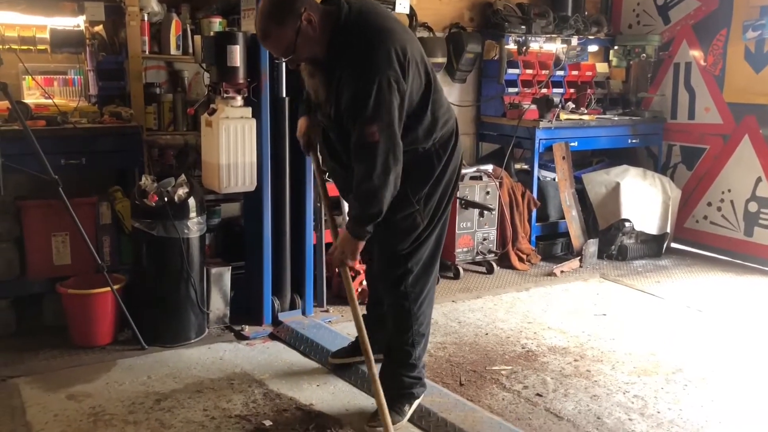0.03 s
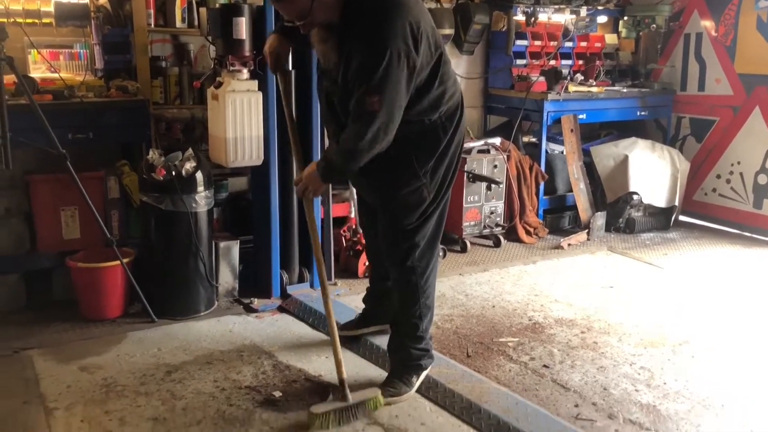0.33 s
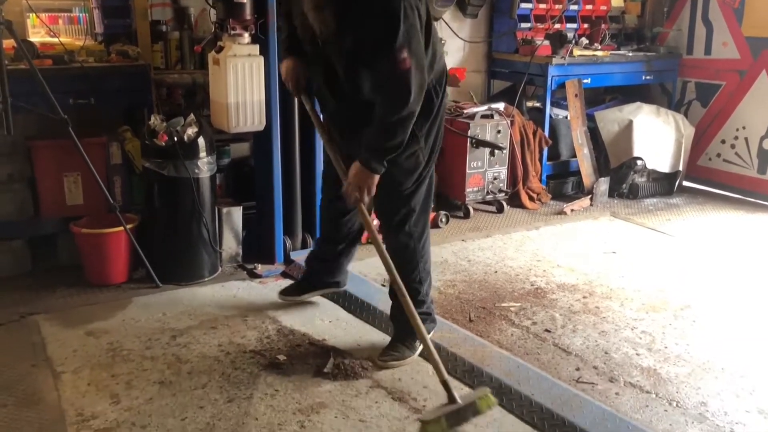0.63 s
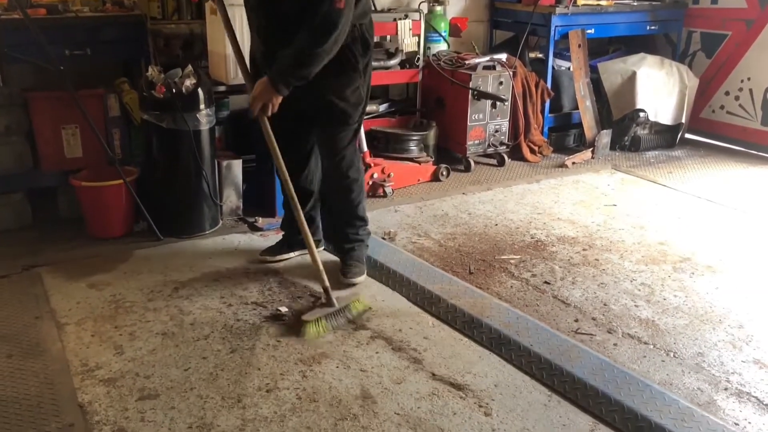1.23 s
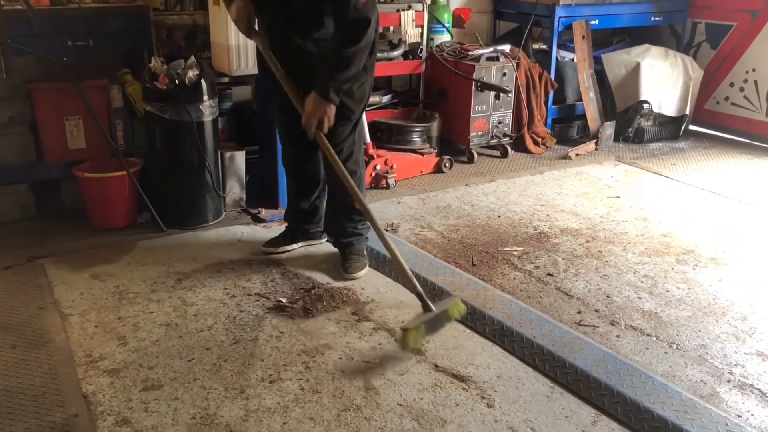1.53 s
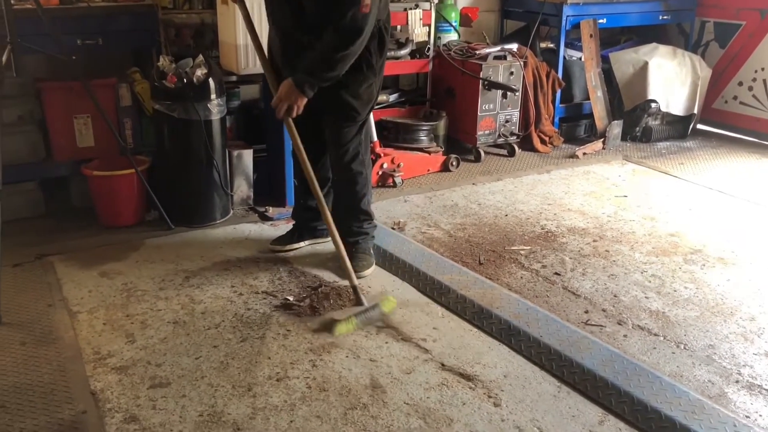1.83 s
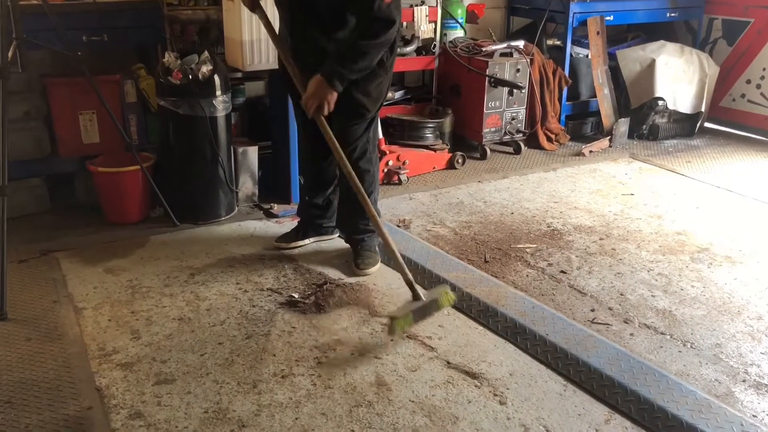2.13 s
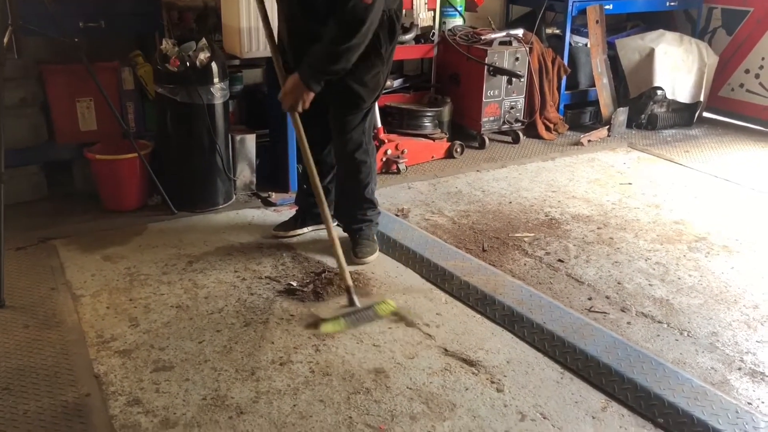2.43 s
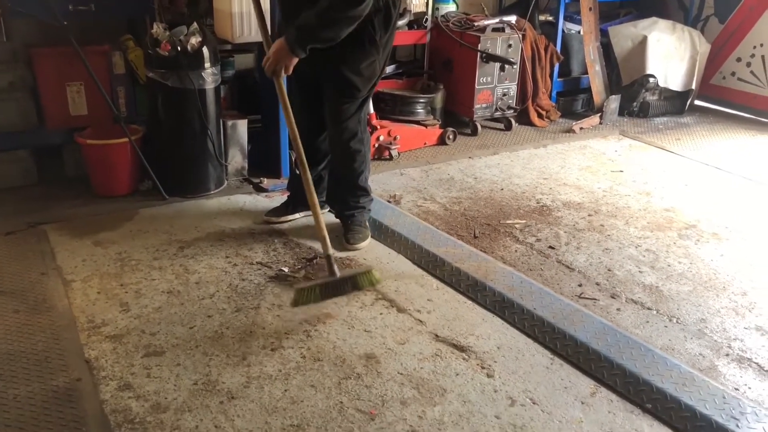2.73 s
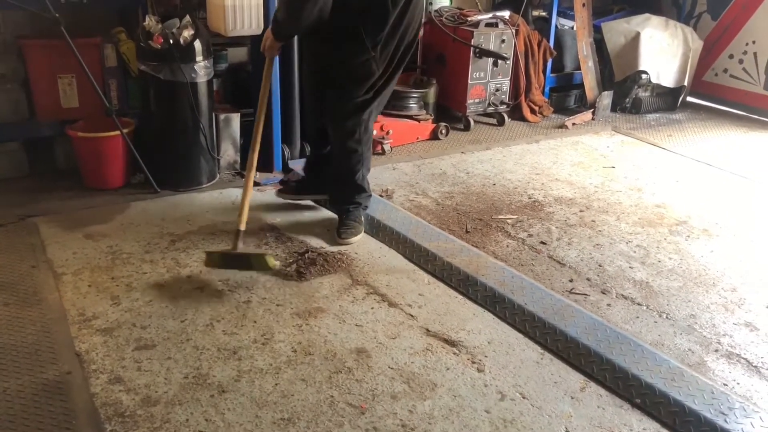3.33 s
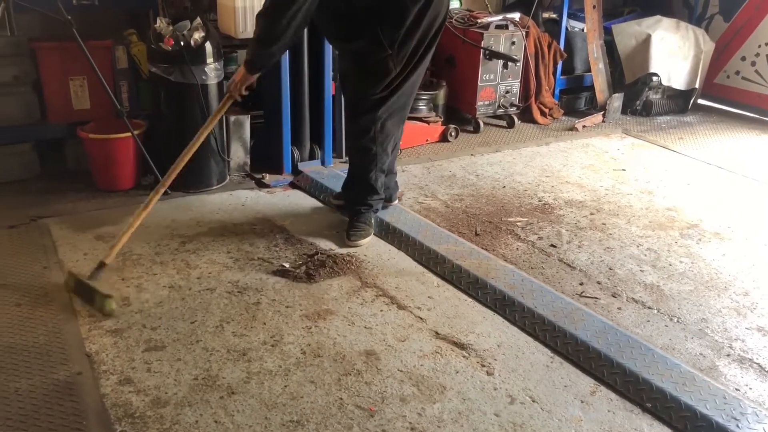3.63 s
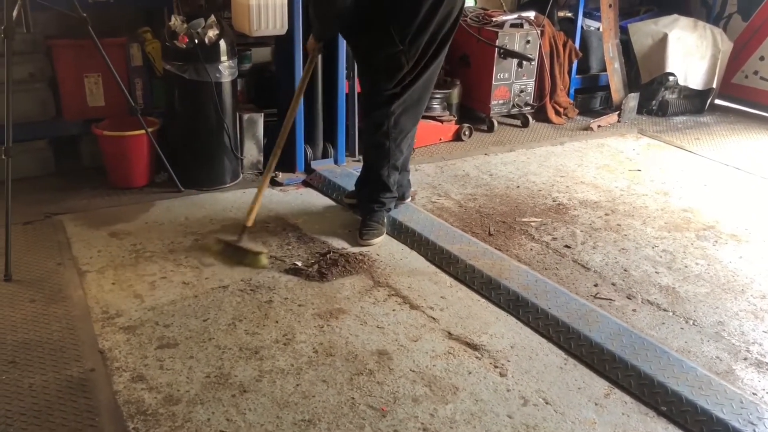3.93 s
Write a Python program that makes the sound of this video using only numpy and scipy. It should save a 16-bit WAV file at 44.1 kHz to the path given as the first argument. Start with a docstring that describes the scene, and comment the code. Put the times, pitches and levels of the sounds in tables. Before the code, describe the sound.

Six strokes of a stiff broom scrape grit along concrete in a faintly humming workshop. Bristles tap down, loose stones tick away and shoes scuff, then the broom head hits the floor with a rattling knock and sweeps once more.

```python
"""Over a faint room hum, a stiff broom starts the first of six strokes on a concrete workshop floor.
In each, the bristles tap down and hiss over rolling grit; the first two push into the dirt pile,
and most strokes also rasp. From 0.7 s single stones skitter away; from 0.8 s the sweeper's shoes
scuff and thud. At 3.6 s the broom head knocks on the floor and rattles, and the last stroke follows."""
import sys
import numpy as np
from scipy import signal
from scipy.fft import rfft, irfft
from scipy.io import wavfile
from scipy.ndimage import uniform_filter1d

SR = 44100
rng = np.random.default_rng(int(sys.argv[2]) if len(sys.argv) > 2 else 0)


def store_pcm(level_fs):
    """Save levels as 16-bit WAV."""
    pcm = np.round(np.clip(level_fs, -1, 1) * 32767).astype(np.int16)
    wavfile.write(sys.argv[1], SR, np.atleast_2d(pcm).T)


N = 176400


def undb(db):
    """Decibels to gain."""
    return 10 ** (np.asarray(db) / 20)


def since(start_s):
    """Seconds since start_s, per sample."""
    return np.arange(N) / SR - start_s


def colour(x, spectrum):
    """Shape x by (f/Hz, level/dB) points, roll off the bass, scale to rms 1."""
    hz, db = np.array(spectrum, float).T
    f = np.maximum(np.fft.rfftfreq(N, 1 / SR), 1)
    gain = undb(np.interp(np.log(f), np.log(hz), db))
    low_cut = f ** 2 / (f ** 2 + (hz[0] / 2) ** 2)
    y = irfft(rfft(x) * gain * low_cut, N)
    return y / np.std(y)


def noise(spectrum):
    """Coloured noise, rms 1."""
    return colour(rng.standard_normal(N), spectrum)


def clicks(per_s, spread_db):
    """Random tiny impacts, most weak, a few strong."""
    size = undb(spread_db * np.minimum(rng.exponential(size=N), 4.5))
    return (rng.random(N) < per_s / SR) * size * rng.choice([-1, 1], N)


def wander(rate_hz):
    """Smooth random curve, standard deviation 1."""
    hold = int(SR / rate_hz)
    y = uniform_filter1d(rng.standard_normal(N)[np.arange(N) // hold], hold)
    return y / np.std(y)


def swell(centre_s, half_s):
    """Gaussian envelope."""
    return np.exp(-.5 * (since(centre_s) / half_s) ** 2)


def blow(start_s, attack_s, t60_s):
    """Impact envelope: linear rise, exponential decay."""
    t = np.maximum(since(start_s), 0)
    return np.minimum(t / attack_s, 1) * np.exp(-np.log(1000) * t / t60_s)


def hits(table, spectrum, attack_s):
    """One noise burst per row."""
    return noise(spectrum) * sum(undb(db) * blow(s, attack_s, t60) for s, db, t60 in table)


def ringing_hits(table, spectrum, modes, attack_s, ring_db):
    """Noise bursts, each exciting the same modes."""
    ring = sum(undb(db + mode_db) * blow(s, attack_s, t60) * np.sin(2 * np.pi * hz * since(s))
               for s, db, _ in table for hz, mode_db, t60 in modes)
    return hits(table, spectrum, attack_s) + undb(ring_db) * ring


# hum spectrum: f/Hz, level/dB
HUM_SPECTRUM = [(22, -25), (40, -0.5), (70, -6), (115, 4.5), (165, 0.5), (220, 1.5), (275, -2.5),
                (450, -7.5), (700, -10.5), (850, -10.5), (1250, -10), (1700, -16.5), (2600, -23.5),
                (7000, -32), (15500, -40.5)]
# hum envelope: t/s, level/dB
HUM_ENVELOPE = [(0, -56), (.7, -54.5), (1.3, -54.5), (2.2, -56), (2.752, -53.5), (3.2, -51.5), (3.5, -54),
                (4, -53)]


def room_hum():
    """Faint low noise, drifting in level."""
    level_db = np.interp(since(0), *np.array(HUM_ENVELOPE).T)
    return noise(HUM_SPECTRUM) * undb(level_db)


def workshop(x, wet_db):
    """The cluttered room adds a short, dull, diffuse tail."""
    decay = blow(start_s=0.0057, attack_s=0.0088, t60_s=0.18)
    tail = (noise([(100, 9), (3000, 6.5), (15000, 0)]) * decay)[:SR]
    tail /= np.sqrt(np.sum(tail ** 2))
    return x + undb(wet_db) * signal.fftconvolve(x, tail)[:N]


# weight shifts: t/s, level/dB, t60/s
THUD_HITS = [(.833, -47.5, .15), (1.308, -45, 0.17), (2.372, -41.5, 0.6), (2.422, -28.5, 0.2),
             (2.495, -44, 0.69)]
# thud spectrum: f/Hz, level/dB
THUD_SPECTRUM = [(30, -15), (70, -7), (105, -2), (175, 0), (280, -5.5), (450, -19.5), (900, -48),
                 (3000, -78)]
# thud modes: f/Hz, level/dB, t60/s
LOW_MODES = [(104.6, -6, 0.85), (169.3, 4.5, 0.29), (182, -9, 0.15), (275.5, -5, .16)]


def thuds():
    """The sweeper's weight shifts with dull thuds."""
    return ringing_hits(THUD_HITS, THUD_SPECTRUM, LOW_MODES, attack_s=0.0066, ring_db=-4)


# footfalls: t/s, level/dB, t60/s
STEP_HITS = [(.831, -32.5, 0.076), (.901, -44, 0.34), (1.328, -50, 0.25), (2.424, -45.5, 0.27),
             (2.635, -54, 0.25), (3.564, -40, 0.4), (3.98, -46, 0.37)]
# scuff spectrum: f/Hz, level/dB
STEP_SPECTRUM = [(80, -66), (250, 0), (410, 0.5), (540, 2), (680, -1), (900, -2.5), (1500, -15),
                 (3000, -25.5), (10000, -38)]
# sole modes: f/Hz, level/dB, t60/s
SHOE_MODES = [(415, 1.5, 0.095), (444, -8.5, 0.084), (700, -6, 0.12), (1053, -12.5, 0.16),
              (1630, -20, 0.14), (1944, -18.5, 0.17)]


def shoes():
    """Shoes scuff the concrete; the soles ring."""
    return ringing_hits(STEP_HITS, STEP_SPECTRUM, SHOE_MODES, attack_s=0.0063, ring_db=-1.5)


# stray grain spectrum: f/Hz, level/dB
STRAY_SPECTRUM = [(800, -4), (3000, 0.5), (6000, -9.5), (9000, -8), (15500, -3.5)]


def stray_grains():
    """Loose grains land throughout, each rolling on briefly."""
    landings = clicks(per_s=420, spread_db=4.5)
    roll = (rng.standard_normal(N) * blow(0, attack_s=0.0015, t60_s=0.024))[:SR]
    return undb(-73) * colour(signal.fftconvolve(landings, roll)[:N], STRAY_SPECTRUM)


# stone ticks: t/s, level/dB, t60/s
STONE_HITS = [(.745, -74, 0.059), (.78, -65, .06), (.829, -52, .02), (.972, -50, 0.037),
              (1.536, -46.5, 0.039), (1.677, -59, 0.029), (2.16, -62, 0.061), (2.25, -70, 0.093),
              (2.285, -70, 0.048), (2.705, -65, 0.064), (2.772, -65, 0.039), (2.875, -73, .05),
              (3.137, -40, .018), (3.354, -49, 0.061), (3.394, -54, .04), (3.451, -57, 0.057),
              (3.87, -44, .09), (3.978, -43, 0.097)]
# tick spectrum: f/Hz, level/dB
STONE_SPECTRUM = [(1000, -26), (3000, -39), (4500, 12), (6500, 1), (8500, 7), (11000, 1), (15500, 2.5)]


def stones():
    """Single stones skitter away from the bristles."""
    return hits(STONE_HITS, STONE_SPECTRUM, attack_s=0.0015)


# blow and rebounds: t/s, level/dB
HEAD_BLOWS = [(3.6004, -2.5), (3.607, -4.5), (3.665, -16)]
# head and handle modes: f/Hz, level/dB, t60/s
HEAD_MODES = [(266, -6.5, 0.23), (359, 0.5, 0.28), (420, -5.5, 0.32), (471.6, -3.5, 0.36), (594, -5, 0.42),
              (733, -8, 0.13), (850, 1, 0.24), (882, -5, 0.31), (1085, -1, .28), (1123, -18, 0.21),
              (1361, -8, 0.36), (1545, -11, 0.46), (1770, -8, .26), (1950, -0.5, 0.14), (2238, -11, 0.16),
              (2430, -16, .2)]
# clatter spectrum: f/Hz, level/dB
CLATTER_SPECTRUM = [(60, -28), (120, -11), (200, -8.5), (340, 2), (800, -1.5), (1100, -8), (2100, -6),
                    (2800, -15.5), (4000, -21), (7000, -25.5), (15500, -39.5)]
# crack spectrum: f/Hz, level/dB
CRACK_SPECTRUM = [(150, -18), (400, 0.5), (2100, 1.5), (3200, -6.5), (4200, -8), (7000, -22), (15500, -37)]


def head_knock():
    """Each blow on the floor cracks, rings head and handle, and leaves a clatter in the room."""
    def struck(t60_s):
        return np.sqrt(sum((undb(db) * blow(s, 0.0016, t60_s)) ** 2 for s, db in HEAD_BLOWS))

    ring = sum(undb(db) * struck(t60) * np.sin(2 * np.pi * (hz * since(0) + rng.random()))
               for hz, db, t60 in HEAD_MODES)
    clatter = struck(t60_s=0.54) * noise(CLATTER_SPECTRUM)
    crack = struck(t60_s=0.093) * noise(CRACK_SPECTRUM)
    return undb(-29) * ring + undb(-30.5) * clatter + undb(-25.5) * crack


# floor taps: t/s, level/dB, t60/s
TAP_HITS = [(.03, -43.5, 0.11), (.8275, -40.5, 0.036), (1.166, -41, .05), (1.709, -42.5, 0.1),
            (2.328, -42, .075), (2.417, -46.5, 0.13), (3.0225, -36, 0.092), (3.661, -37, 0.058),
            (3.709, -36.5, 0.13), (3.976, -47, 0.1)]
# tap spectrum: f/Hz, level/dB
TAP_SPECTRUM = [(200, -13), (900, -9.5), (2200, 2), (2700, -4.5), (3400, 2), (5000, -6), (8000, -10),
                (15500, -27)]


def taps():
    """Bristles and stones tap the floor."""
    return hits(TAP_HITS, TAP_SPECTRUM, attack_s=0.0047)


# bristle judder: t/s, half length/s, centre f/Hz, level/dB
RASP_SWELLS = [(0.254, 0.037, 1850, -57), (0.337, 0.044, 2160, -57.5), (0.516, 0.091, 4000, -63.5),
               (0.58, 0.14, 1520, -63), (1.093, 0.063, 1910, -55), (1.173, 0.0043, 2310, -44.5),
               (1.21, .04, 2540, -52.5), (2.423, 0.017, 1570, -49.5), (2.51, 0.077, 1410, -60),
               (3.163, 0.064, 960, -58.5), (3.89, 0.096, 1665, -60)]


def rasping(relative_bandwidth=0.13):
    """Stick-slip clicks ring the bent bristles in a narrow band."""
    out = 0
    for s, half_s, hz, db in RASP_SWELLS:
        resonance = signal.iirpeak(hz, 1 / relative_bandwidth, fs=SR)
        band = signal.lfilter(*resonance, clicks(per_s=1500, spread_db=1.1))
        out += undb(db) * band / np.std(band) * swell(s, half_s)
    return out


# strokes: t/s, rise/s, hold/s, release/s, hiss level/dB, grit level/dB, fade over release/dB
BROOM_STROKES = [(-.01, 0.11, 0.3, 0.17, -51.5, -54.5, 11.5), (0.838, 0.13, 0.4, 0.38, -50.5, -53.5, 20),
                 (1.703, 0.078, 0.14, 0.066, -51.5, -53.5, 3), (2.321, 0.076, 0.13, .13, -54, -51, 5.5),
                 (3.016, 0.057, 0.17, 0.37, -51, -51.5, 30), (3.66, 0.21, .2, .1, -49, -54, 10)]
# pushes into the pile: t/s, half length/s, grit level/dB, hiss level/dB
PILE_PUSHES = [(0.338, 0.025, -51, -55), (1.226, 0.047, -45, -51.5), (1.31, 0.017, -49, -52)]
# bristle spectrum: f/Hz, level/dB
HISS_SPECTRUM = [(200, -13), (700, -13), (1500, -3), (2800, -4), (4300, 1.5), (5600, -1.5), (7000, -2),
                 (8500, 2), (10500, -2), (12500, -1.5), (15500, -1.5)]
# grit spectrum: f/Hz, level/dB
GRIT_SPECTRUM = [(150, -17), (400, -3.5), (700, -6.5), (1300, -2.5), (2000, 0.5), (2900, -2.5), (4000, 0),
                 (6500, -3.5), (10000, -9.5), (15500, -8)]


def sweeping(lift_db_per_s=234):
    """Bristle flicks and rolling grit follow the pressure of each stroke."""
    hiss_gain, grit_gain = 0, 0
    for start_s, rise_s, hold_s, release_s, hiss_db, grit_db, fade_db in BROOM_STROKES:
        t = since(start_s)
        easing_s = t - rise_s - hold_s
        eased_db = fade_db * np.clip(easing_s / release_s, 0, 1)
        lifted_db = lift_db_per_s * np.maximum(easing_s - release_s, 0)
        pressure = np.clip(t / rise_s, 0, 1) * undb(-eased_db - lifted_db)
        hiss_gain += undb(hiss_db) * pressure ** 1.08  # hiss grows faster than grit
        grit_gain += undb(grit_db) * pressure
    for s, half_s, grit_db, hiss_db in PILE_PUSHES:
        push = swell(s, half_s)
        hiss_gain = np.hypot(hiss_gain, undb(hiss_db) * push)
        grit_gain = np.hypot(grit_gain, undb(grit_db) * push)
    bristles = hiss_gain * colour(clicks(per_s=14000, spread_db=2), HISS_SPECTRUM)
    grit = grit_gain * colour(clicks(per_s=3500, spread_db=2), GRIT_SPECTRUM)
    flutter_db = 0.74 * wander(rate_hz=45.33)
    return (bristles + grit) * undb(flutter_db)


def scene():
    """Mono mix; only the sweeping sounds get the room tail."""
    hum = room_hum()
    broom = sweeping() + stray_grains() + taps() + rasping() + stones()
    return (hum + workshop(broom, wet_db=-10) + shoes() + thuds() + head_knock())[None]


def record(dry, cutoff_hz=15700):
    """Steep elliptic low-pass."""
    return signal.sosfilt(signal.ellip(10, .1, 60, cutoff_hz, fs=SR, output="sos"), dry)


dry = scene()
out = record(dry)
store_pcm(out)
```